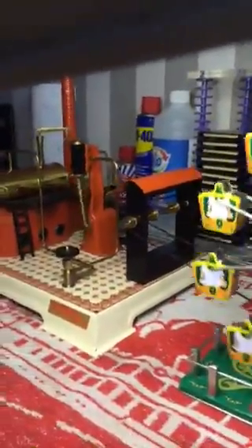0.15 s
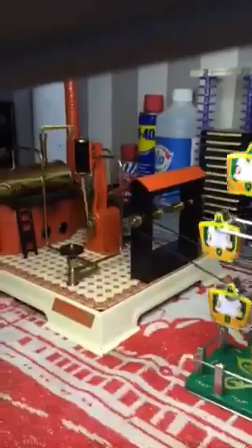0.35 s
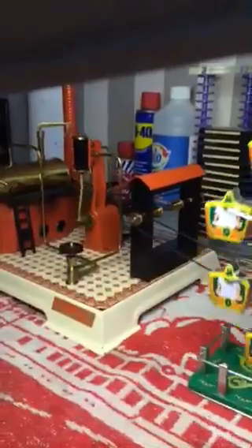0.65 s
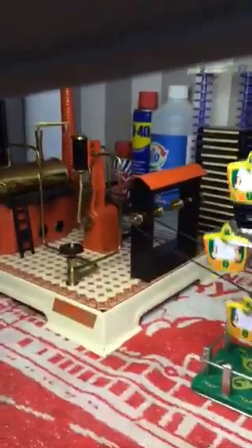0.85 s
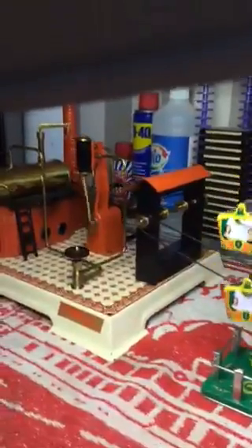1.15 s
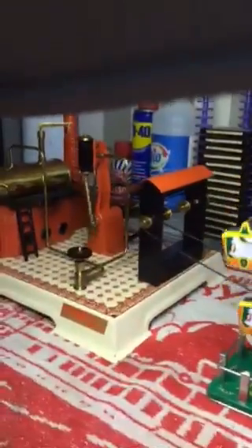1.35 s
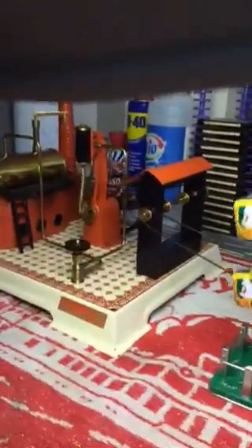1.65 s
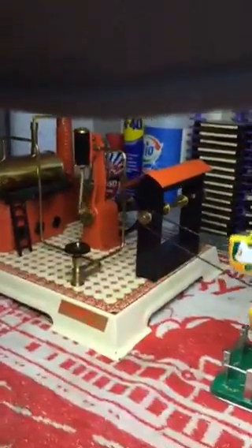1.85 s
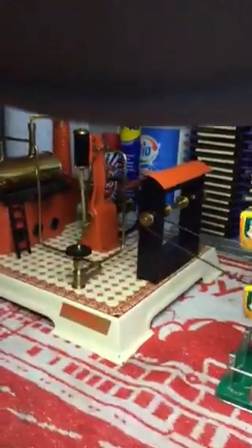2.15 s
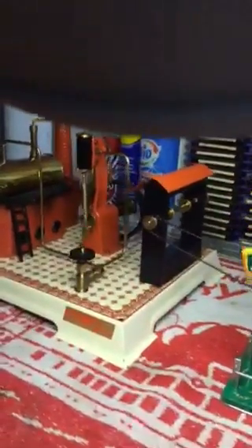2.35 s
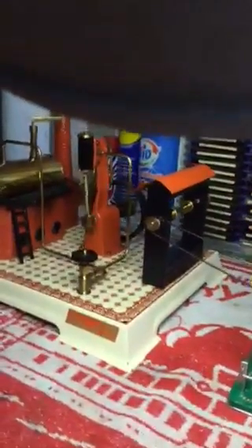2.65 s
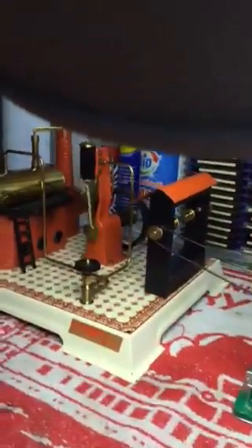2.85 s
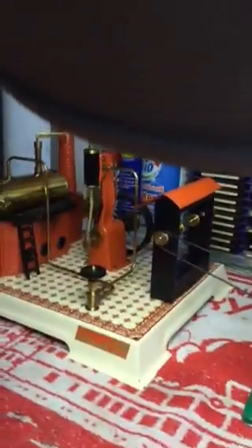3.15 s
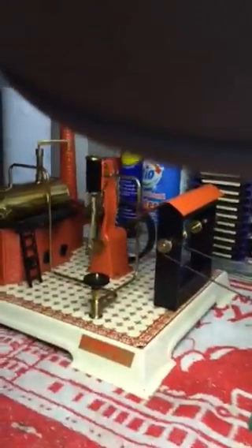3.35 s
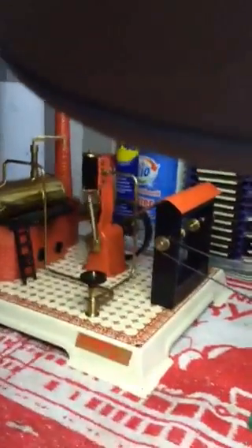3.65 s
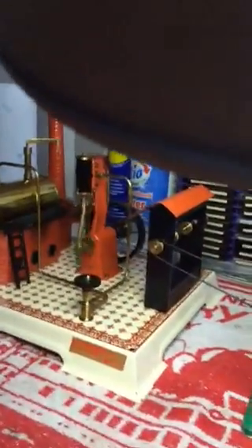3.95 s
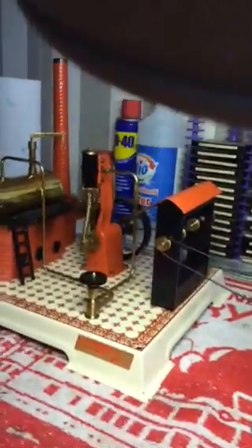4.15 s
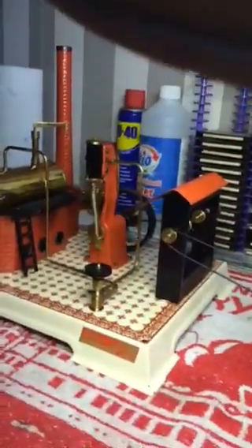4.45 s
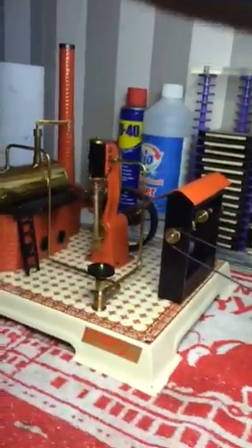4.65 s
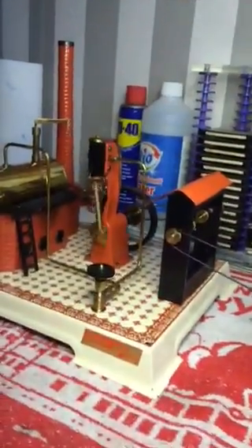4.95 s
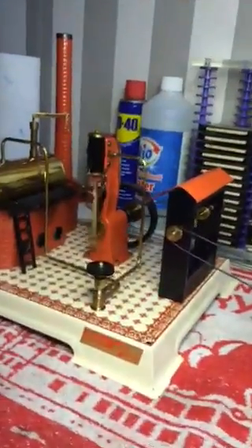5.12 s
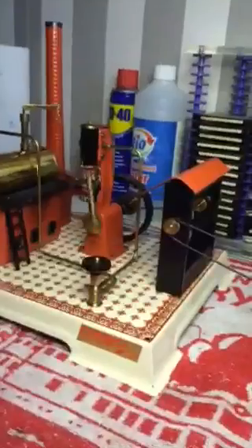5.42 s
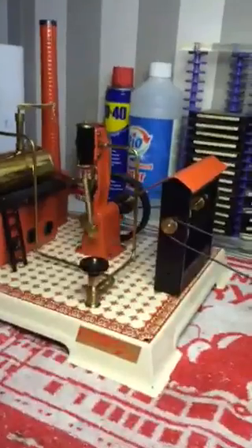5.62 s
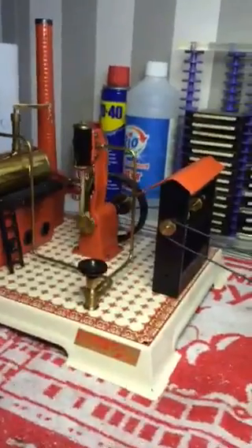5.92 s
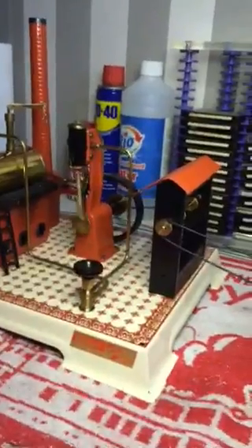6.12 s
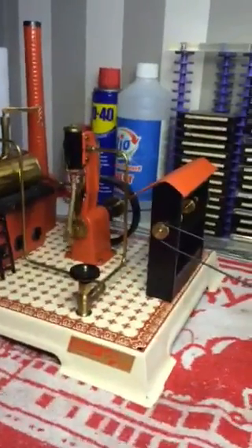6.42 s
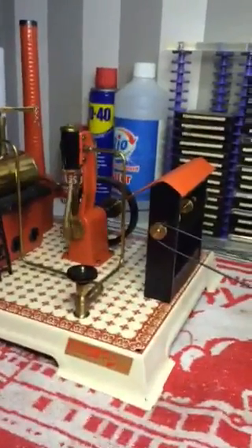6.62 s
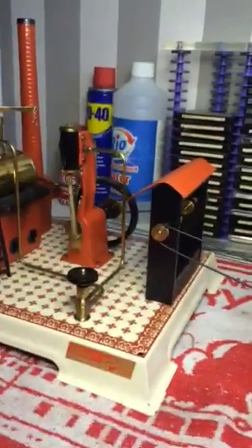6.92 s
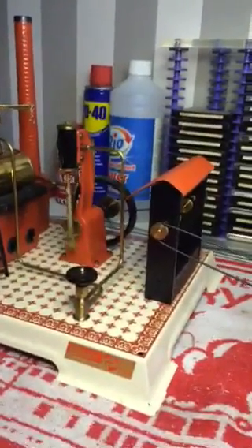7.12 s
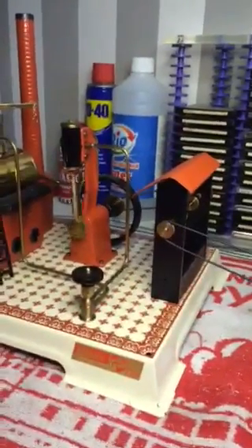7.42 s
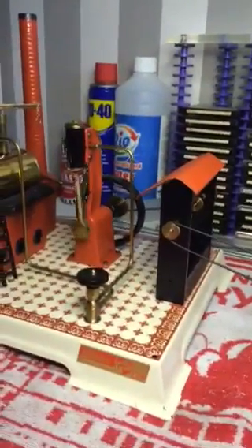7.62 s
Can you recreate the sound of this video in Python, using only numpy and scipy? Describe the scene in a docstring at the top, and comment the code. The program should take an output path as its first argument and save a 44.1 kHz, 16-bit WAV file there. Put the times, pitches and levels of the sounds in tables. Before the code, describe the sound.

Close, rapid metallic clatter of a toy steam engine in a quiet room, faint hiss beneath, with two shelf clacks and a late sharp snap.

```python
"""First a faint steam hiss over bearing hum and low handling rumble, then at once a toy engine's ticks, taps and thuds.
It stands on a tin plate in a quiet room, close to a hand-held phone, and makes four to five turns a second.
Crank angle places damped plate thuds, light pin taps and valve ticks; hard taps are listed, loose rattles random.
Steam spits and hum are coloured noise, hand bumps are low pulses through the case; a short room answer follows.
Something hard clacks twice on the shelf, and late on one bright snap rings out."""
import sys
import numpy as np
from scipy import signal
from scipy.fft import rfft, irfft, next_fast_len
from scipy.io import wavfile
from scipy.ndimage import map_coordinates

SR = 44100
rng = np.random.default_rng(int(sys.argv[2]) if len(sys.argv) > 2 else 0)


def to_wav(sig):
    """Store sig (one row per channel, or 1-D mono) as 16-bit WAV at the path in sys.argv[1].

    Samples outside -1..1 are clipped; the rate is SR.
    """
    pcm = np.clip(np.atleast_2d(sig), -1, 1) * 32767
    pcm = np.round(pcm).astype(np.int16)
    wavfile.write(sys.argv[1], SR, pcm.T)  # frames by channels


N = 343098


def amp(db):
    """Amplitude factor of a level in dB."""
    return 10 ** (np.asarray(db) / 20)


def unit(x):
    """Scales a sound to rms 1."""
    return x / np.sqrt(np.mean(x ** 2) + 1e-20)


def along(points, hz):
    """Reads (f/Hz, value) points on a log frequency axis."""
    f, v = np.transpose(points)
    return np.interp(np.log(hz + 1), np.log(f + 1), v)


def over_time(times, values):
    """Draws a setting as a line through its points, one value per sample."""
    return np.interp(np.arange(N) / SR, times, values)


def wobble(rate):
    """A smooth random curve, rate knots a second."""
    return map_coordinates(rng.standard_normal(int(N * rate / SR) + 4), [np.arange(N) * rate / SR])


def filtered(x, response):
    """Multiplies the spectrum of x by a complex response of frequency."""
    m = next_fast_len(len(x) + SR // 2)
    return irfft(rfft(x, m) * response(np.fft.rfftfreq(m, 1 / SR)), m)[:len(x)]


def noise(spectrum, count=N):
    """Coloured noise of rms 1."""
    return unit(filtered(rng.standard_normal(count), lambda hz: amp(along(spectrum, hz))))


DETUNE = .012  # random spread of each mode from blow to blow, as a share of its pitch


def ring(modes, scatter_db, count=SR // 5, detune=DETUNE):
    """Damped modes (f/Hz, level/dB, t60/s); neighbours swing in opposite directions."""
    t = np.arange(count) / SR
    out = np.zeros(count)
    for k, (hz, db, t60) in enumerate(modes):
        level = amp(db + scatter_db * rng.normal() - 60 * t / t60)
        out += (-1) ** k * level * np.sin(2 * np.pi * hz * (1 + detune * rng.normal()) * t)
    return out


def push(sound, seconds):
    """A smooth blow that lasts a while and so dulls the ring."""
    force = np.hanning(int(seconds * SR) + 3)
    return np.convolve(sound, force / force.sum())


def chatter(sound, seconds, rise=0.00013):
    """A loose contact: many small touches that die away; peak 1."""
    t = np.arange(SR // 25) / SR
    touches = (1 - np.exp(-t / rise)) * np.exp(-t / seconds) * rng.standard_normal(len(t)) ** 3
    out = signal.fftconvolve(sound, touches)
    return out / abs(out).max()


def add(track, s, sound):
    """Mixes a sound in at time s."""
    part = track[round(s * SR):][:len(sound)]
    part += sound[:len(part)]


# Handling and steam levels at the phone: t/s, rumble level/dB, hiss level/dB (both rms, before they waver)
RUNNING = [(0.0, -64, -66.5), (1.97, -60, -67), (2.51, -52.5, -65.5), (3.05, -50.5, -67.5),
           (3.47, -54.5, -64.5), (4.29, -60.5, -66), (4.72, -65.5, -65), (5.76, -55, -65),
           (6.13, -62, -66.5), (7.04, -60, -65.5), (7.24, -57, -67), (7.78, -72, -65.5)]
# Colour of the steady leak: f/Hz, relative level/dB
HISS = [(800, -48), (2000, -1.5), (4000, 0.5), (8000, -3), (11500, -5.5), (15000, -2.5)]
# Short steam spits: t/s, relative level/dB, time scale/s
SPIT = [(1.111, -54, 0.0056), (1.755, -55, 0.01), (2.988, -50, 0.012), (4.152, -50, 0.0046),
        (5.003, -54, 0.0069)]
# Colour of the spits: f/Hz, relative level/dB
SPIT_COLOUR = [(1760, -27), (3000, -12), (10300, -9), (15500, -11.5)]


def steam():
    """Turbulent steam as coloured noise: a steady leak that flutters, and short spits."""
    s, _, hiss_db = np.transpose(RUNNING)
    flutter_db = 1.1 * wobble(8) + 1.3 * wobble(40)
    out = amp(over_time(s, hiss_db) + flutter_db) * noise(HISS)
    for s, db, length in SPIT:
        t = np.arange(SR // 10) / SR / length
        add(out, s, amp(db) * t * np.exp(1 - t) ** 2 * noise(SPIT_COLOUR, count=len(t)))
    return out


# Colour of bearings and belt heard through the plate: f/Hz, relative level/dB
HUM = [(59, -3), (100, 3.5), (155, 4), (232, -10.5), (330, -6.5), (403, -10.5), (492, -5.5), (576, -5),
       (1030, -11), (1240, -9.5), (1630, -17.5), (3000, -25.5), (3900, -24), (6600, -120)]


def hum():
    """Shaft and belt shake the plate unevenly: coloured noise with a wavering level."""
    return amp(-53.5 + 1.34 * wobble(16) + 3.14 * wobble(60)) * noise(HUM)


# Bumps of the hand on the phone: centre t/s, peak level/dB, f/Hz, length/cycles
BUMP = [(2.509, -34.5, 86, 2.1), (2.831, -39, 70.6, 3.2), (3.056, -32.5, 65.6, 2.7),
        (5.501, -45, 85.4, 3.5), (5.558, -30.5, 94, 1.2), (5.662, -35.5, 68.4, 1.8),
        (6.458, -43, 67.4, 1.8), (7.319, -37.5, 66.5, 2)]


def hand():
    """Low rumble and bell-shaped low pulses through the phone's case, right at the microphone."""
    s, rumble_db, _ = np.transpose(RUNNING)
    level_db = over_time(s, rumble_db) + 2.5 * wobble(6)
    out = amp(level_db) * noise([(15, -47), (35, -20), (65, 8.5), (100, -4), (140, -7), (300, -99)])
    t = np.arange(-SR // 10, SR // 10) / SR
    for s, db, hz, cycles in BUMP:
        bump = np.exp(-(2 * t * hz / cycles) ** 2) * np.cos(2 * np.pi * hz * t)
        add(out, s - len(t) / SR / 2, -amp(db) * bump)
    return out


# Flywheel speed: t/s, speed/turns a minute
SPEED = [(0, 294.8), (0.45, 305.2), (1.2, 303.5), (1.55, 284.0), (2.35, 287.9), (3, 283.6), (3.4, 294.7),
         (3.95, 297.9), (4.45, 280.5), (4.95, 248.8), (5.65, 266.6), (7.0, 275.4), (7.78, 298.2)]
FIRST_UP_S = .1609  # the up stroke that sets crank angle zero


def moments(angle):
    """Times at which the crank passes an angle (turns after the up stroke; one value, or one per sample)."""
    t = np.arange(N) / SR
    turns = np.cumsum(over_time(*np.transpose(SPEED))) / 60 / SR
    since_up = turns - turns[round(FIRST_UP_S * SR)] - angle
    return t[1:][np.diff(np.floor(since_up)) > 0]


DOWN_LAG_S = .015  # the down thud comes this long after the half turn


def stroke_ends():
    """Times of the down and up thuds, half a turn of the crank apart but for the lag."""
    return moments(.5) + DOWN_LAG_S, moments(0)


# How loud each part of a turn is, before trims and scatter: t/s, down thud level/dB, up thud level/dB,
# jingle level/dB, valve opening level/dB, valve closing level/dB, closing angle/turns
TURN = [(0, -43.5, -35.5, -51.5, -47.5, -49, 0.98), (1.1, -41.5, -36.5, -50, -54.5, -50, 0.84),
        (1.9, -41.5, -33, -48.5, -56.5, -55.5, 0.85), (2.7, -38.5, -35.5, -49.5, -77, -47, 0.81),
        (3.3, -38, -34, -46, -53, -48, .846), (3.8, -44, -32, -47, -57, -48.5, .854),
        (4.3, -40, -36.5, -44, -47, -43, 0.87), (5.2, -36, -35, -48, -55, -47.5, .853),
        (6.3, -37.5, -32.5, -45.5, -46, -41.5, 0.86), (7.78, -36, -33.5, -44, -45.5, -39, 0.84)]
# Modes of the slide valve: f/Hz, relative level/dB, t60/s
VALVE = [(8580, 5.5, 0.0043), (10040, 14, 0.002), (10130, 5.3, 0.0056), (11400, 4.9, 0.0055)]
# Modes of the connecting rod: f/Hz, relative level/dB, t60/s
ROD = [(1995, -0.5, 0.017), (3004, -14, 0.036), (3226, -7, 0.0088), (4430, -3.5, 0.015), (5180, -5, 0.0063),
       (6980, -11.5, 0.019)]
OPEN_TURNS = .311  # crank angle after the up stroke at which the valve opens
TICK_SCATTER_DB = 2.5


def valve():
    """The slide valve ticks as it opens and closes: chattering high modes, a spurt of noise and the rod."""
    out, t = np.zeros(N), np.arange(SR // 20) / SR
    at, _, _, _, open_peak, close_peak, close_turns = np.transpose(TURN)
    closings = moments(over_time(at, close_turns))
    for times, peak in (moments(OPEN_TURNS), open_peak), (closings, close_peak):
        for s in times:
            db = np.interp(s, at, peak) + TICK_SCATTER_DB * rng.normal()
            spurt = amp(-21.5 - 60 * t / 0.065) * noise([(5000, -30), (8500, 10), (15000, -12)], count=len(t))
            tick = chatter(ring(VALVE, 1.6, count=900), 0.00051)[:len(t)]
            add(out, s, amp(db) * (spurt + tick))
            add(out, s, amp(db - 8) * chatter(ring(ROD, 3.5, count=2000), 0.006, rise=0.0045))
    return out


# Modes of the tin base plate; levels are relative within each kind of blow:
# f/Hz, down stroke level/dB, up stroke level/dB, tap level/dB, t60/s
PLATE = [(189, -2, -0.5, -33, 0.039), (198.7, -32, -14.5, -44, 0.13), (270, -27, -19, -29, 0.16),
         (404, -8.5, -6.5, -20, 0.098), (575.8, 3.5, 0.5, -10, 0.074), (662.3, -3.5, -9.5, -38.5, 0.11),
         (760, -20, -7.5, -10.5, 0.069), (945.5, -13.5, -9, -15.5, 0.091), (1123, -41, -30, -1.5, 0.048),
         (1249, 7, 0, 5.5, 0.03), (1443, -37, -40, -7, 0.037), (1512, -10.5, -19, -16, 0.075)]
DOWN, UP, TOUCH = 1, 2, 3  # columns of the plate table


def plate_modes(blow):
    """The plate's modes as one kind of blow stirs them."""
    return [(row[0], row[blow], row[4]) for row in PLATE]


# Spells of dense rattling, faint to loud: start t/s, length/s, loudest peak level/dB
SHAKE = [(1.434, 0.097, -64), (1.77, 0.18, -42.5), (4.17, .1, -37.5), (4.267, .2, -48), (4.997, 0.04, -48)]
SHAKES_PER_S = 110


def linkage():
    """Loose joints chatter on plate and rod: lightly at random moments, and in spells of dense rattling."""
    out, tap_modes = np.zeros(N), plate_modes(TOUCH)
    for s, size in rng.random((220, 2)):
        joint = ring(tap_modes, 5, count=2000) + amp(-9) * ring(ROD, 4, count=2000)
        loudness = -10 * np.log10(size + .15)  # few are loud
        add(out, s * N / SR, amp(-56.5 + loudness) * chatter(joint, .003))
    for start, length, db in SHAKE:
        for s, size in rng.random((round(length * SHAKES_PER_S), 2)):
            joint = amp(-3) * ring(tap_modes, 5, count=2000) + ring(ROD, 6, count=2000, detune=.08)
            add(out, start + s * length, amp(db - 9 * size) * chatter(joint, .003))
    return out


# Hard taps on the plate, mostly of the crank pin; the one at 4.2013 s belongs to the clack: t/s, peak level/dB
TAP = [(0.063, -40), (0.2705, -30), (0.4645, -28.5), (0.5696, -34), (0.6591, -32), (0.7586, -36),
       (0.8579, -28.5), (1.054, -30), (1.1503, -33), (1.3508, -40), (1.4932, -36), (1.5622, -36),
       (1.6697, -35.5), (1.7745, -32), (1.7957, -31.5), (1.8246, -33.5), (1.8789, -28), (1.9757, -35.5),
       (2.1939, -40), (2.5043, -30), (2.7137, -33.5), (2.9246, -38), (3.1425, -40.5), (3.2355, -36),
       (3.3432, -32), (3.8483, -33), (3.9515, -32.5), (4.0513, -32.5), (4.153, -29.5), (4.2013, -28),
       (4.2541, -32), (4.362, -30.5), (4.579, -31.5), (4.6916, -28.5), (4.807, -31), (4.9185, -32),
       (5.0402, -28.5), (5.1543, -31.5), (5.2796, -33.5), (5.3395, -36), (5.3934, -35.5), (5.513, -32.5),
       (5.6213, -30), (5.7356, -28), (5.8446, -30), (5.965, -36), (6.4072, -32), (6.6693, -37.5),
       (6.7356, -31.5), (6.8442, -32.5), (7.1682, -33), (7.2358, -41.5), (7.2749, -31), (7.3795, -34),
       (7.483, -35), (7.5406, -41.5), (7.6764, -38.5), (7.6933, -32.5)]
TAP_LEAD_S, TAP_LAG_S = .005, 0.00193  # light taps: before the down thud, after the up thud
LIGHT_TAP_DB = -44  # typical light tap, peak
JINGLE_GROWS, STRAY_JINGLE_DB = 0.23, -6.5  # jingle dB per dB of tap; change between strokes
JINGLE_SCATTER_DB = 1.5


def taps():
    """Taps, mostly of the loose crank pin, chatter on the plate; each sets the rod jingling with a puff of noise."""
    out, t = np.zeros(N), np.arange(SR // 20) / SR
    tap_modes = plate_modes(TOUCH)
    at, _, _, jingle_peak, _, _, _ = np.transpose(TURN)
    downs, ups = stroke_ends()
    # every stroke end without a hard tap gets a light one
    ends = np.r_[downs - TAP_LEAD_S, ups + TAP_LAG_S]
    hard = np.transpose(TAP)[0]
    light = [(s, LIGHT_TAP_DB + 3.5 * rng.normal()) for s in ends if abs(hard - s).min() > .016]
    for s, db in TAP + light:
        add(out, s - .0015, amp(db) * chatter(ring(tap_modes, 3.54), 0.0018, rise=0.0008))
        # on the up stroke the rod jingles from the moment the load lands
        nearest = ups[abs(ups - s).argmin()]
        start = nearest if abs(s - nearest) < .008 else s - .001
        stray = abs(ends - s).min() > .012
        jingle_db = np.interp(s, at, jingle_peak) + JINGLE_GROWS * (db + 35.5)
        jingle_db += stray * STRAY_JINGLE_DB + JINGLE_SCATTER_DB * rng.normal()
        fall = (1 - np.exp(-t / 0.00086)) * (amp(-60 * t / 0.044) + amp(-9.0 - 60 * t / 0.034))
        puff = fall * noise([(1500, -6), (3000, 2.5), (8000, -8), (15000, -12.5)], count=len(t))
        add(out, start, amp(jingle_db - 4.0) * puff)
        add(out, start, amp(jingle_db + 1.5) * chatter(ring(ROD, 5.7, count=2000), 0.013))
    return out


THUD_SCATTER_DB = 1.2
THUD_SWELL_S = 0.0019  # the load builds over this time


def swell(sound):
    """A soft start as the load builds."""
    return sound * (1 - np.exp(-np.arange(len(sound)) / SR / THUD_SWELL_S))


def thuds():
    """At each stroke end the piston load pushes on the plate, and its damped modes ring."""
    out = np.zeros(N)
    at, down_peak, up_peak, _, _, _, _ = np.transpose(TURN)
    downs, ups = stroke_ends()
    for s in downs:
        db = np.interp(s, at, down_peak) + THUD_SCATTER_DB * rng.normal()
        add(out, s, amp(db + 2.5) * push(swell(ring(plate_modes(DOWN), 1.83)), 0.00085))
    for s in ups:  # a shorter push, so a less dulled ring
        db = np.interp(s, at, up_peak) + THUD_SCATTER_DB * rng.normal()
        add(out, s, amp(db + 0.9) * push(swell(ring(plate_modes(UP), 1.98)), 0.00051))
    return out


# Clacks on the shelf: t/s, level before trim/dB, unringing share level/dB, boom level before the push/dB,
# dull above f/Hz, tail level under the blow/dB, tail t60/s
CLACK = [(4.198, -24.5, -5.5, -48, 4730, -35, 0.34), (6.107, -14, -9.5, -35.5, 4260, -24, 0.13)]
# Resonances of the clacking body: f/Hz, width/Hz, level/dB
CLACK_RING = [(622, 36, 12), (1030, 120, 6.5), (1630, 80, 8), (2175, 140, 8), (2880, 111, 6),
              (3160, 260, 7.5), (5050, 140, -5), (5710, 37, 6)]
# Modes of the shelf's boom: f/Hz, relative level/dB, t60/s
SHELF = [(138.3, 4.5, 0.38), (201, 8, 0.17), (276, 12.5, 0.19)]


def clack_body(f):
    """Response of the struck body: resonances with alternating signs."""
    return sum((-1) ** k * amp(db) * 1j * f * width / (centre ** 2 - f * f + 1j * f * width)
               for k, (centre, width, db) in enumerate(CLACK_RING))


def clacks():
    """Something hard hits the shelf: a scrape of noise rings the body, and the shelf booms."""
    blows, out, t = np.zeros(N), np.zeros(N), np.arange(SR // 3) / SR
    for s, db, dry_db, boom_db, dull_hz, after_db, t60 in CLACK:
        # the blow swells and falls quickly over a weaker, longer tail
        blow, after = (t / 0.0049) ** 2 * np.exp(-t / 0.0014), amp(after_db - 60 * t / t60)
        scrape = amp(db + 15.5) * noise([(300, -10), (900, 0), (dull_hz, 0), (16000, -24)], count=len(t))
        add(blows, s, (blow + amp(-1.5) * after) * scrape)
        add(out, s, amp(dry_db) * (blow + amp(0.5) * after) * scrape)
        boom = push(ring(SHELF, 0, count=SR // 3, detune=0), 0.0045)[:len(t)]
        add(out, s, amp(boom_db) * (1 - np.exp(-(t / 0.0083) ** 2)) * boom)  # the boom swells
    return out + filtered(blows, clack_body)


# The bright snap: t/s, level before its fall/dB
SNAP = [(6.9207, -9)]
# Colour of the snap: f/Hz, relative level/dB
SNAP_COLOUR = [(880, -14.5), (1500, -12), (2890, -16), (4230, -9.5), (8540, -6.5), (13100, -16),
               (15500, -4)]


def snap():
    """A burst of noise that falls fast, then slowly, with a tiny high crack at its start."""
    out, t = np.zeros(N), np.arange(SR // 3) / SR
    for s, db in SNAP:
        fall = amp(-12 - 60 * t / 0.032) + amp(-23 - 60 * t / 0.15)
        add(out, s, amp(db) * fall * np.minimum(t / .0005, 1) * noise(SNAP_COLOUR, count=len(t)))
        crack = np.exp(-((t - .0006) / .0001) ** 2) * np.sin(2 * np.pi * 10000 * (t - .0006))
        add(out, s, amp(-7.5) * crack)
    return out


# Modes of the snap's ring: f/Hz, level relative to the snap/dB, t60/s
SNAP_RING = [(7400, -16, 0.0069), (9400, -15, 0.014), (11230, -2.5, 0.0061), (12200, -11.5, 0.032),
             (14500, -11.5, 0.013)]


def snap_ring():
    """Damped high modes: the short bright ring of the snap, added without room answer."""
    out = np.zeros(N)
    for s, db in SNAP:
        add(out, s + .0003, amp(db) * ring(SNAP_RING, 0, detune=0))
    return out


# How the quiet room dies away: f/Hz, t60/s
ROOM = [(200, 0.35), (2000, 0.24), (12000, 0.19)]


def room(x):
    """Each frequency of the room's answer dies at its own speed; every fifth of a second draws a fresh random tail."""
    out, step = np.zeros(N), SR // 5
    for start in range(0, N, step):
        hz, t, z = signal.stft(rng.standard_normal(SR // 2), SR, nperseg=256)
        decay = amp(-60 * t / along(ROOM, hz)[:, None])
        tail = signal.istft(z * decay, SR, nperseg=256)[1]
        answer = signal.fftconvolve(x[start:start + step], tail / np.linalg.norm(tail))
        add(out, (start + 200) / SR, answer)
    return out


def scene():
    """Engine, clacks and snap with their room answer, plus the sounds added without one."""
    solid = valve() + linkage() + taps() + thuds() + clacks() + snap()
    direct = steam() + hum() + hand() + snap_ring()
    return (solid + room(amp(-13.5) * solid) + direct)[None]


BASS_HZ, TOP_HZ = 30, 15350  # the microphone fades below the first and stops at the second


def record(dry):
    """The phone loses the deep bass and keeps nothing above its band limit."""
    return filtered(dry[0], lambda hz: (hz < TOP_HZ) * (1j * hz / (BASS_HZ + 1j * hz)) ** 2)[None]


dry = scene()
out = record(dry)
to_wav(out)
```